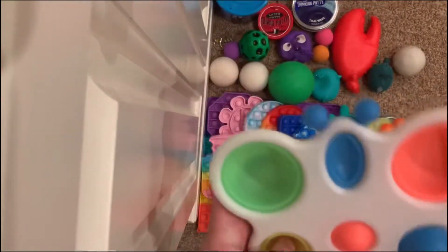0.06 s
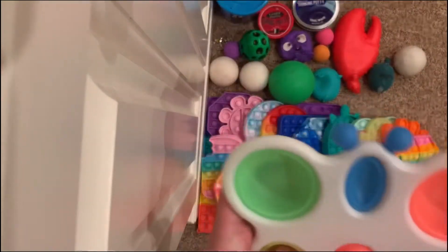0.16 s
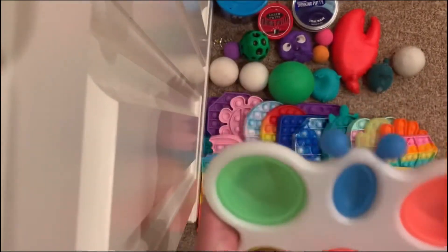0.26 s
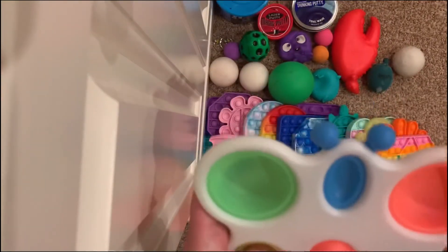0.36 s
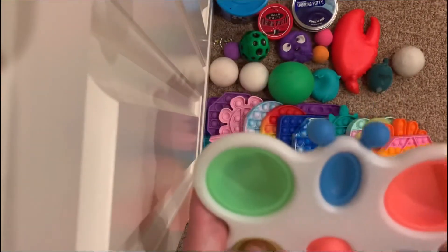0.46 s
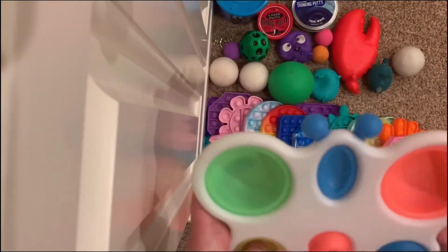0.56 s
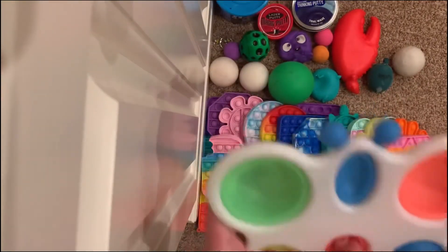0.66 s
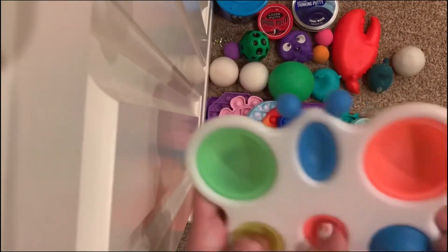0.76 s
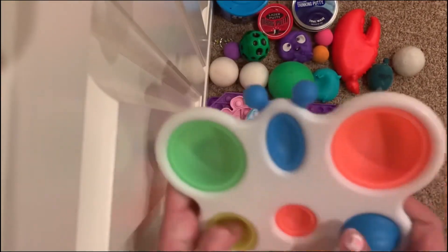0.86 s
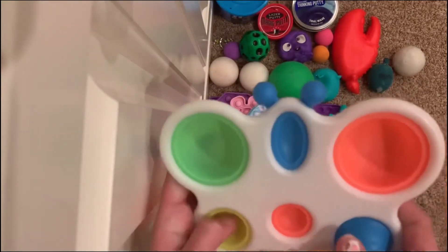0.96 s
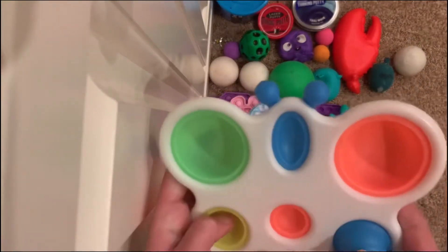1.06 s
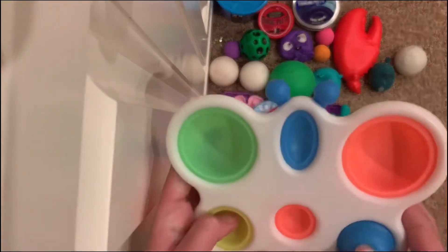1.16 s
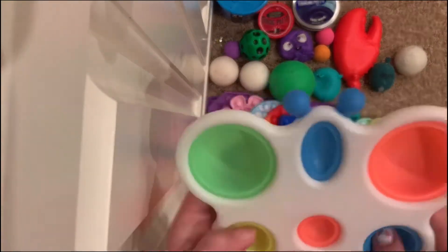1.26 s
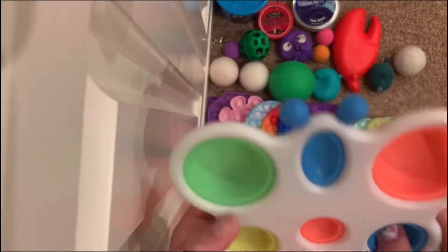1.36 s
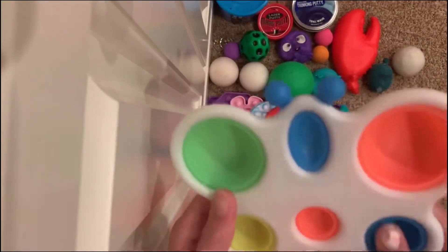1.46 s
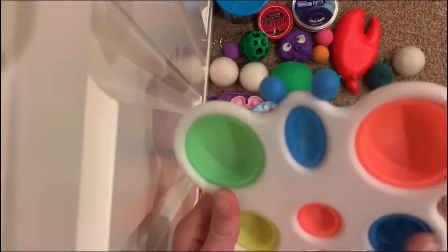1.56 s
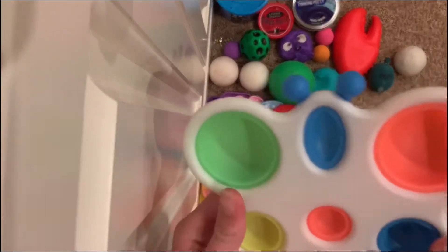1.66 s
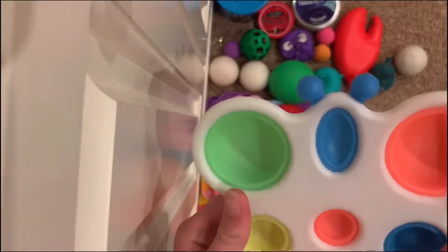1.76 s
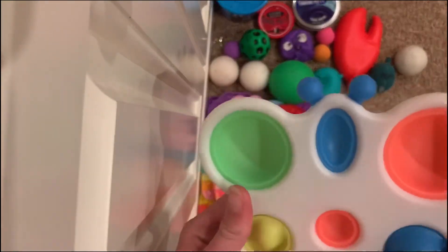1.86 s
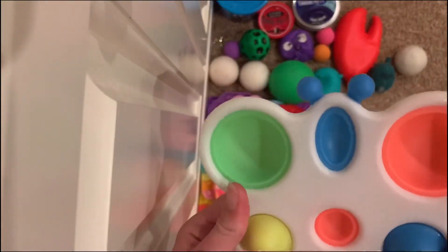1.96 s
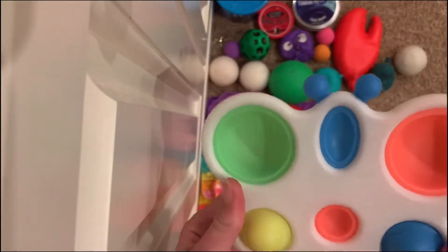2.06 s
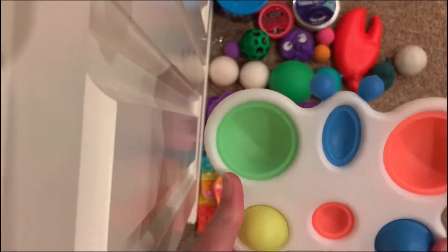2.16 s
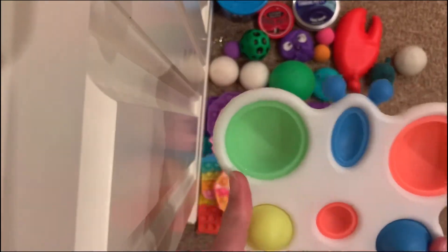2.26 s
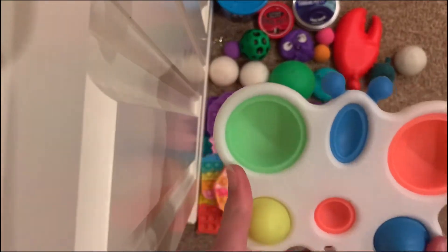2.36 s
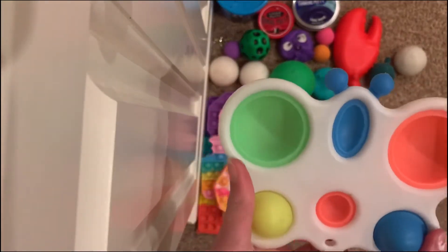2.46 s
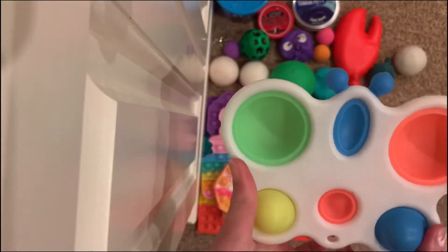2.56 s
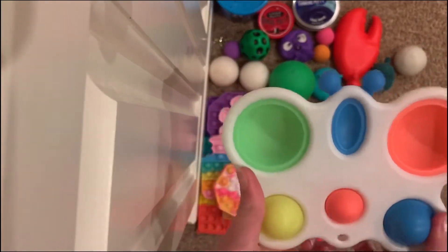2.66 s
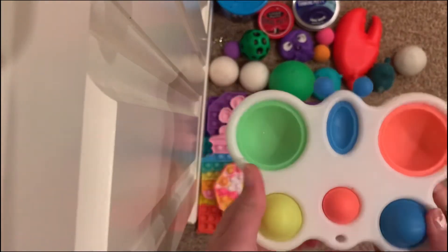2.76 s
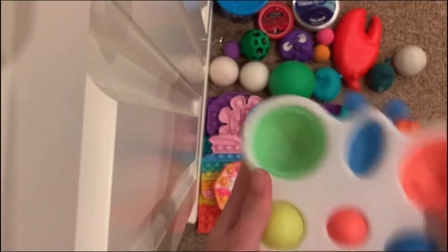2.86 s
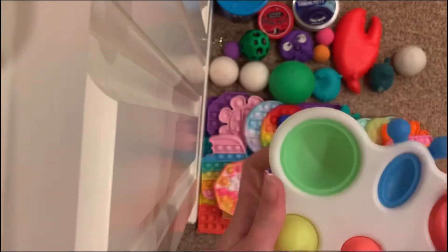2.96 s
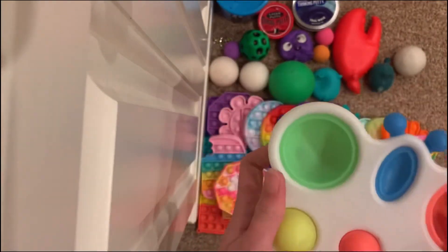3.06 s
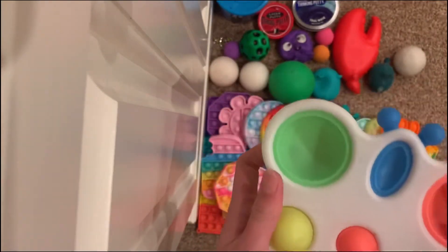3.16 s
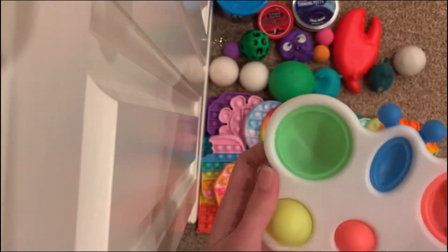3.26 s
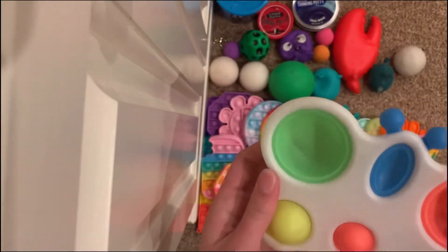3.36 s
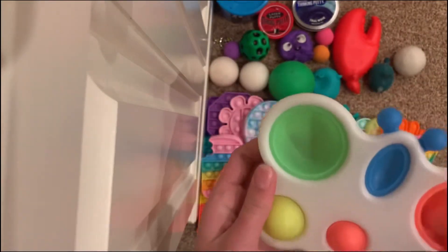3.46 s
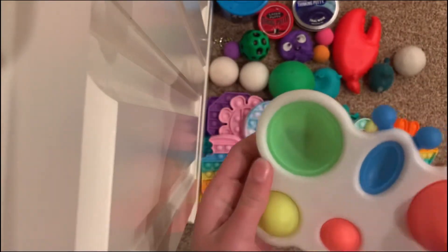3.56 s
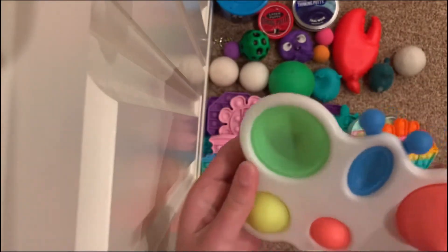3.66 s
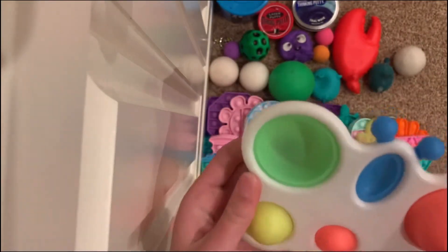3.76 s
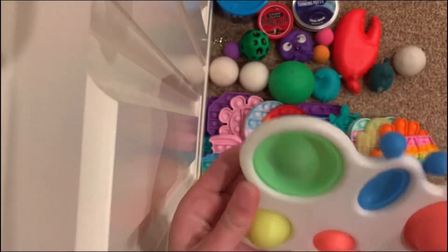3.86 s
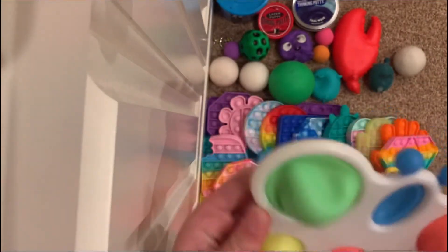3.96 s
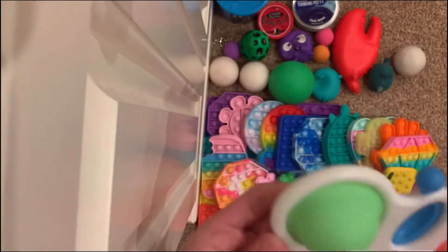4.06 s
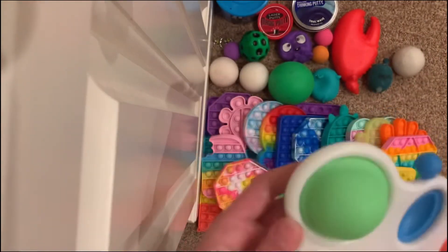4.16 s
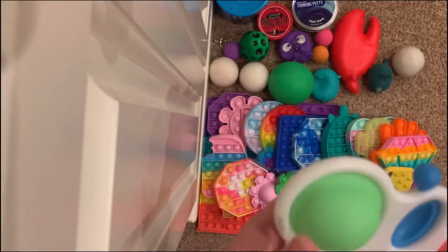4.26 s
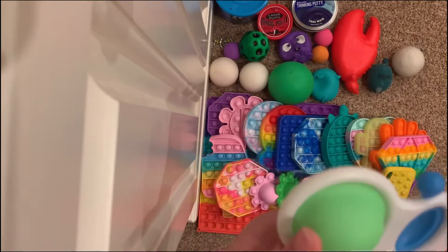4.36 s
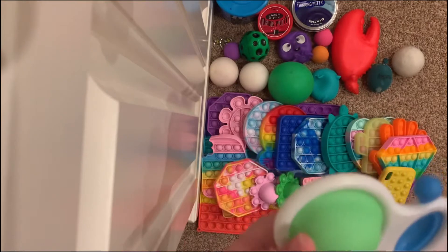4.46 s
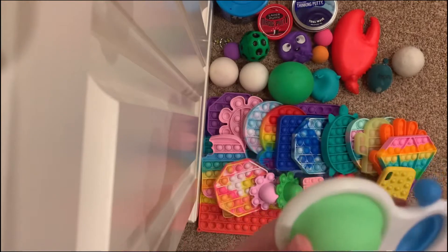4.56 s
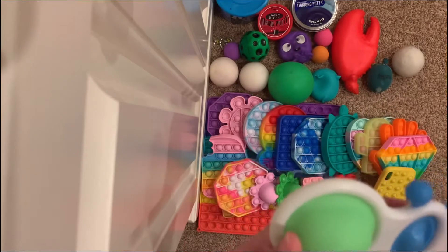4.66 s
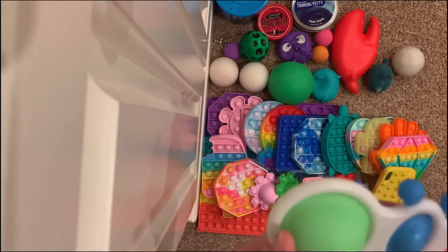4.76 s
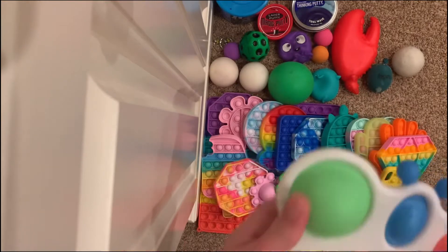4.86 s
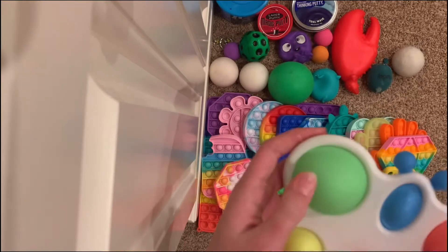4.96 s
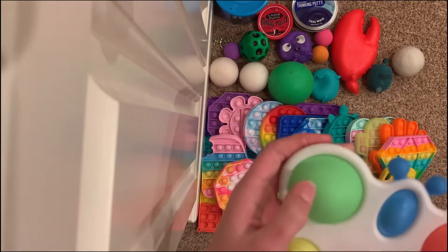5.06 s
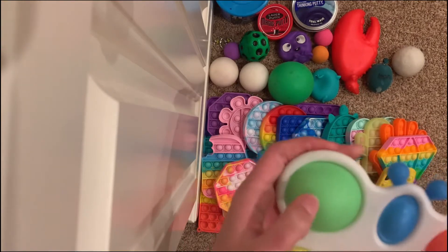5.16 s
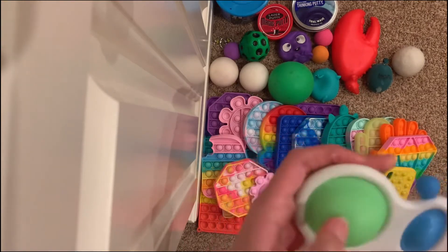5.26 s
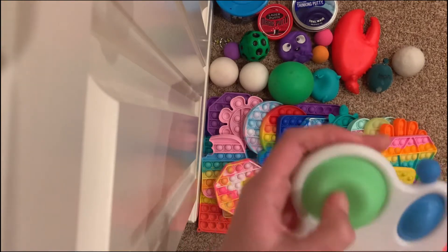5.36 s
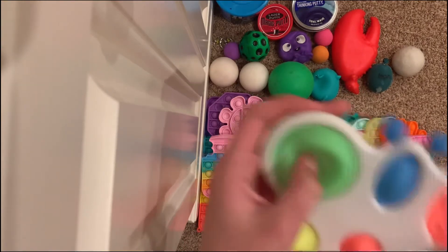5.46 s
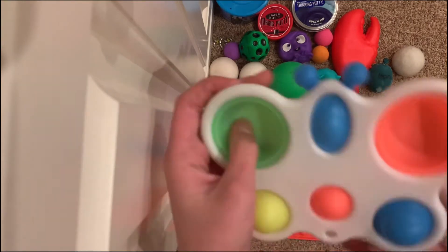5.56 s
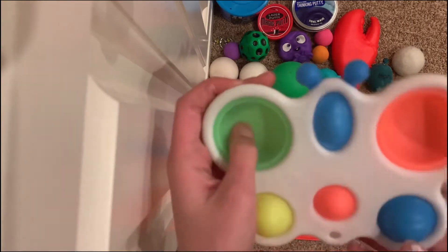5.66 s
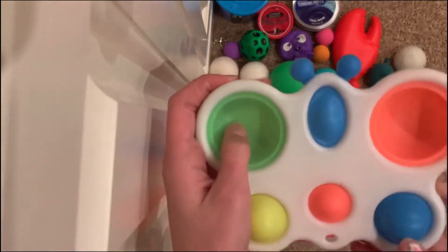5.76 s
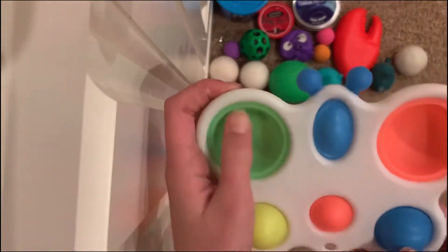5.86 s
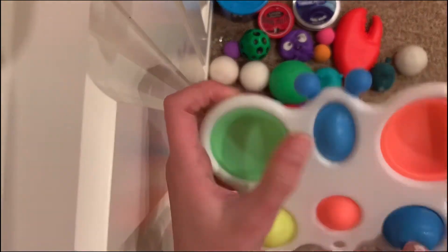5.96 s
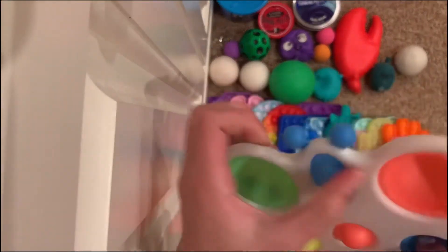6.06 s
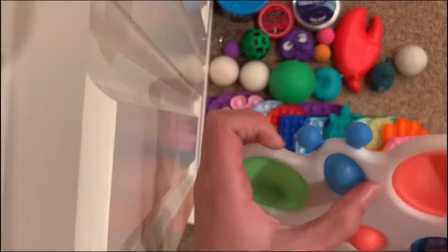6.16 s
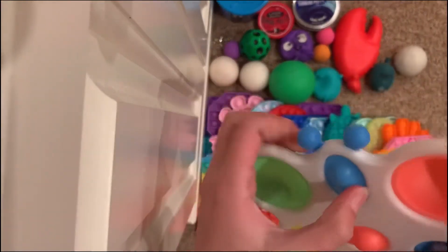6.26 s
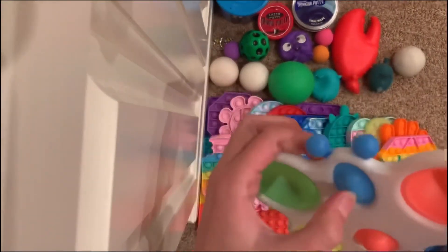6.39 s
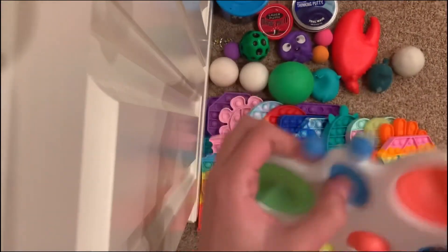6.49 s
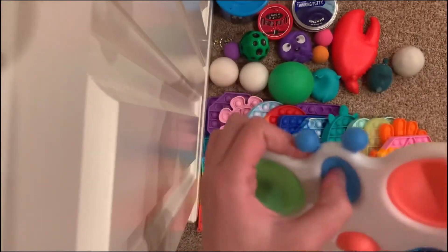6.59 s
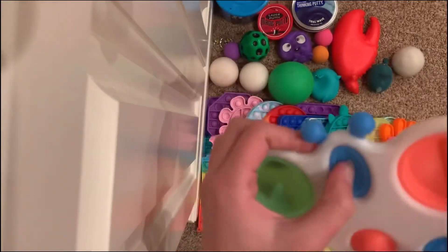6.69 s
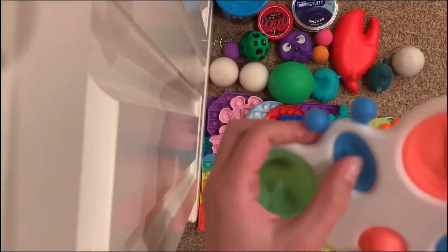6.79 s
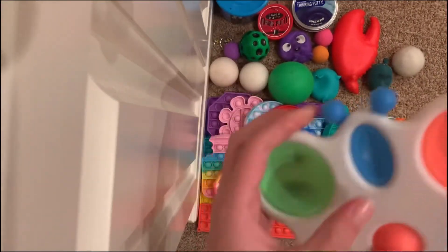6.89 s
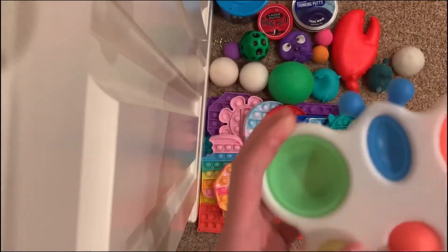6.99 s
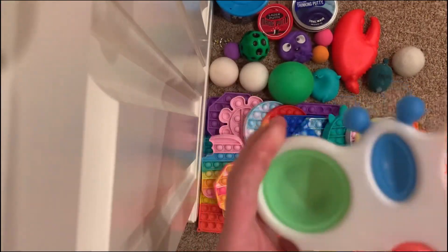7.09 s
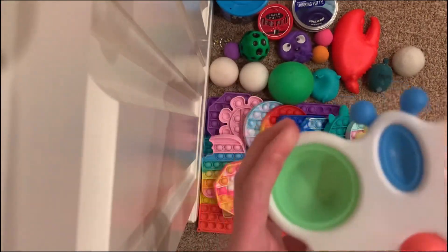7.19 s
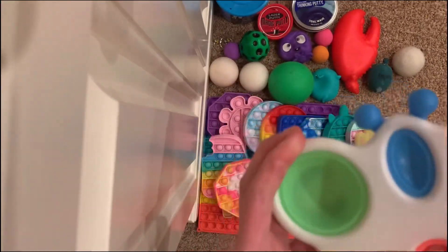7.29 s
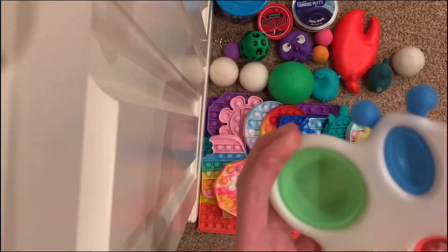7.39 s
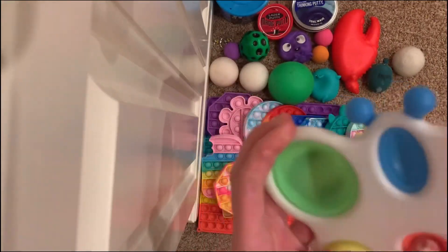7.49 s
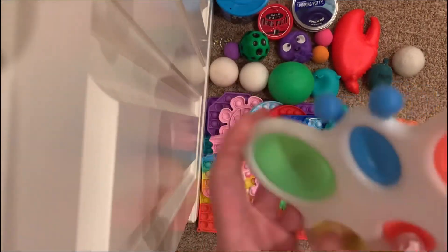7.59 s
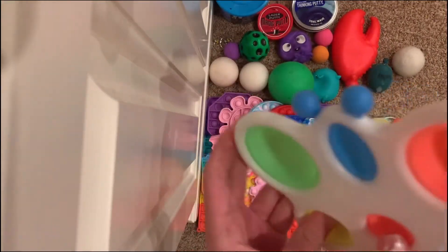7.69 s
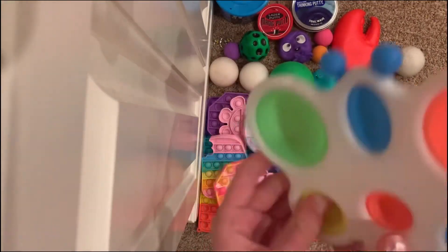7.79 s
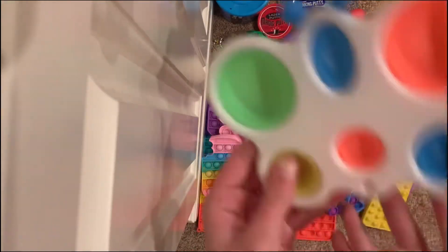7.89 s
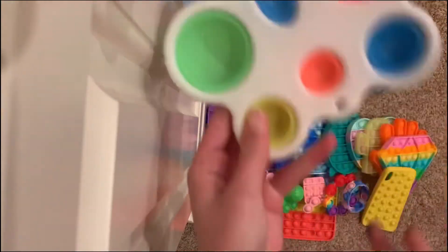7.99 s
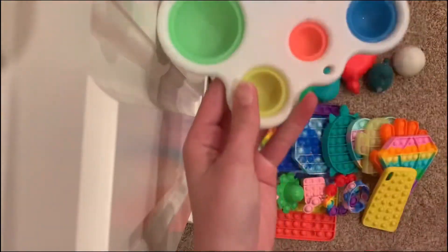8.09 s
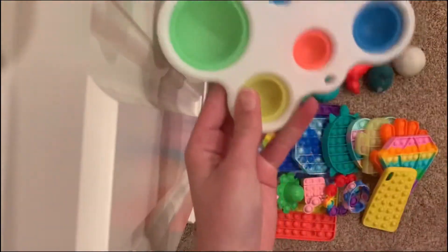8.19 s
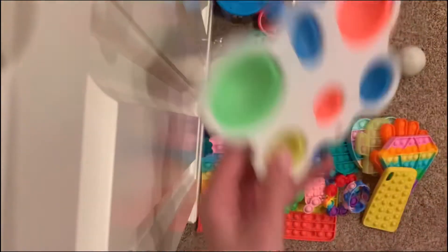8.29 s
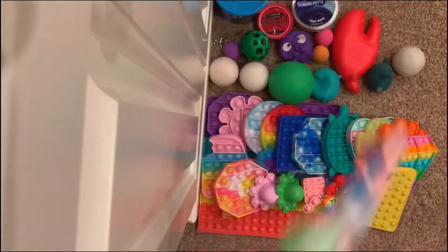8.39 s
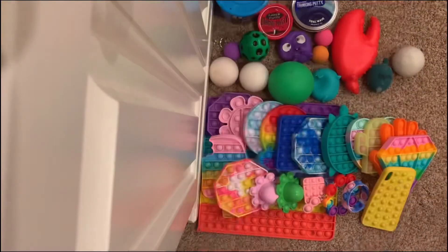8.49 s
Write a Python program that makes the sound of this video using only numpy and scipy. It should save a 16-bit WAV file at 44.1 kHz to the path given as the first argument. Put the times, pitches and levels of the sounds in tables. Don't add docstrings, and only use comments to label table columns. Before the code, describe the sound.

A hand-held popper toy is pressed bubble by bubble right by a two-sided microphone indoors. Strong popping snaps fill the first four seconds, then a quieter stretch of faint touches, then a cluster of sharper clicks from five seconds on. Light fingernail taps, skids and dry rubbing fill the gaps. A low hollow knock and handling scuffs come last, over still air and a weak appliance hum.

```python
import sys
import numpy as np
from scipy import signal
from scipy.fft import rfft, irfft, next_fast_len
from scipy.io import wavfile

SR = 44100
rng = np.random.default_rng(int(sys.argv[2]) if len(sys.argv) > 2 else 0)


def digitize_waveform(pressure):
    field = np.atleast_2d(pressure).T
    bounded = np.clip(field, -1, 1)
    quanta = np.round(bounded * 32767).astype(np.int16)
    wavfile.write(sys.argv[1], SR, quanta)


def boost_factor(decibels):
    exponent = np.asarray(decibels, float) / 20
    return 10 ** exponent


N = 376173
PADDED = next_fast_len(N + 4096)
HZ = np.arange(PADDED // 2 + 1) * SR / PADDED


def clock(seconds):
    return np.arange(round(seconds * SR)) / SR


def add(out, s, x):
    i = max(round(s * SR), 0)
    out[i:i + len(x)] += x[:N - i]


def rms_one(x):
    return x / np.sqrt(np.mean(x ** 2) + 1e-20)


def at_hz(points, hz):
    f, level = np.array(points).T
    return np.interp(np.log(hz + 1), np.log(f + 1), level)


def band(x, low_hz, high_hz):
    return signal.sosfilt(signal.butter(2, [low_hz, high_hz], "band", fs=SR, output="sos"), x)


def fade(t, t60):
    return boost_factor(-60 * t / t60)


def attack(t, rise):
    return 1 - np.exp(-t / rise)


def burst(t, low_hz, high_hz, t60, rise):
    x = band(rng.standard_normal(len(t)) * attack(t, rise) * fade(t, t60), low_hz, high_hz)
    return x / np.abs(x).max()


def wander(rate_hz):
    r = np.exp(-32 * np.pi * rate_hz / SR)
    slow = signal.lfilter([1], [1, -2 * r, r * r], rng.standard_normal(N // 16 + 3002))
    slow = slow[3000:]
    return np.interp(np.arange(N) / 16, np.arange(len(slow)), rms_one(slow))


def pops():
    # (peak t/s, ring peak level/dB, ring f/Hz, rattle rel. level/dB, crack rel. level/dB)
    domes = [(0.578, -5.5, 1307, -12, -6), (1.2228, -10, 1630, -17, -2.5), (1.7881, -11, 1125, -20.5, -14),
             (1.7938, -5, 823, -30, -17.5), (1.8944, -4.5, 1140, -28.5, -17),
             (2.5754, -7.5, 1110, -49.5, -21), (3.5274, -8, 1130, -27.5, -6), (3.919, -33, 1120, -15, -9.5),
             (3.963, -8, 1450, -15.5, -11), (5.202, -19.5, 1080, -4.5, -6.5),
             (5.2153, -19.5, 1361, -4.5, 0.5), (5.217, -15.5, 1200, -6.5, 5.5), (5.4557, -21, 860, -6, 5),
             (5.4877, -23.5, 2170, -5, -7), (5.5095, -12, 1606, -5.5, 0.5), (6.0181, -19.5, 840, -5, 7),
             (6.4816, -31.5, 1479, 1.5, 12.5), (6.484, -10.5, 1490, -8.5, 1), (7.2366, -13, 1374, -8, 1.5),
             (7.5875, -16.5, 1130, -10.5, -0.5)]
    swell_s = .0009
    out, t = np.zeros(N), clock(.08)
    for s, db, hz, rattle_db, crack_db in domes:
        turns = hz * (0.79 * t + .0011 * attack(t, 0.0018))
        skin = t / swell_s * np.exp(1 - t / swell_s) * np.sin(2 * np.pi * turns)
        flap = boost_factor(-6.0) * burst(t, 350, 1400, 0.027, rise=0.00088)
        rattle = boost_factor(rattle_db + 10.0) * burst(t, 2600, 4700, 0.023, rise=0.0028)
        crack = boost_factor(crack_db + 10.0) * burst(t, 3100, 15000, 0.011, rise=0.00045)
        creak = boost_factor(-19.5) * burst(t, 560, 3000, 0.018, rise=0.00063)[::-1]
        creak = creak + boost_factor(-42.0) * burst(t, 3500, 13000, 0.065, rise=.002)[::-1]
        add(out, s - swell_s, boost_factor(db - 2.5) * (skin + flap))
        add(out, s - .0015, boost_factor(db - 2.5) * (rattle + crack))
        add(out, s - swell_s - t[-1], boost_factor(db) * creak)
    return out


def rings():
    # (t/s, peak level/dB, f/Hz, t60/s)
    frame_tones = [(0.576, -12.5, 1396, 0.023), (1.2212, -15.5, 1630, 0.012), (1.2235, -18, 855, 0.014),
                   (1.796, -12.5, 985, 0.015), (1.8955, -14, 1000, .025), (2.576, -17, 800, 0.014),
                   (3.526, -11.5, 1086, 0.026), (3.528, -18, 1602, 0.016), (3.9625, -14, 2178, 0.028),
                   (3.963, -13, 915, 0.023), (5.2152, -3, 1197, .022), (5.5105, -16, 1050, .015),
                   (5.51, -14, 2300, .01), (5.2191, -21.5, 1850, 0.032), (5.4543, -25, 2500, 0.016),
                   (5.5092, -3, 1730, 0.013), (6.021, -26, 1125, 0.022), (6.484, -19, 1500, 0.02),
                   (7.2352, 0, 1440, .02), (7.2385, -11, 760, 0.014), (7.2405, -13, 1600, .02),
                   (7.588, -23, 540, 0.035), (8.4755, -24, 1050, 0.019), (8.486, -35.5, 1960, 0.018),
                   (1.226, -20, 282, 0.037), (3.53, -25.5, 248, 0.036)]
    out, t = np.zeros(N), clock(.06)
    for s, db, hz, t60 in frame_tones:
        add(out, s, boost_factor(db) * attack(t, .0008) * fade(t, t60) * np.sin(2 * np.pi * hz * t))
    return out


def puffs():
    # (peak t/s, peak level/dB, f/Hz, recoil rel. level/dB)
    cups = [(0.1414, -61, 207, 17), (0.5788, -20, 337, -11.5), (1.208, -28.5, 330, -8),
            (1.2234, -15, 592, -18.5), (1.7939, -5.5, 757, -19), (1.8373, -26.5, 456, -17.5),
            (1.8952, -10.5, 572, -34.5), (2.575, -16.5, 860, -12.5), (3.529, -6.5, 554, -32),
            (3.9212, -22, 547, -19.5), (3.9657, -10, 375.6, -14), (4.6625, -39, 240, 0.5),
            (4.8043, -48.5, 253, 1), (5.205, -20.5, 407, -1.5), (5.219, -14.5, 388, -8.5),
            (5.458, -17.5, 314.4, -15.5), (5.514, -9.5, 318, -8.5), (6.0099, -24.5, 361, -16.5),
            (6.02, -18, 504.4, -8.5), (6.4844, -24, 641.5, -5), (7.2374, -15, 340.5, -15.5),
            (7.5877, -11.5, 504, -13.5), (8.517, -34.5, 500, -2.5)]
    out, t = np.zeros(N), clock(.1)
    for s, db, hz, recoil_db in cups:
        turns = hz * (t + 0.00019 * attack(t, 0.004))
        pump = attack(t, 0.0026) * fade(t, 0.011) * np.sin(2 * np.pi * turns)
        recoil = boost_factor(recoil_db + 1.5) * np.sin(2 * np.pi * 185 * t) * fade(t, 0.048)
        add(out, s - .002, boost_factor(db - 0.5) * (pump / np.abs(pump).max() + recoil))
    return out


def sways():
    # (t/s, level/dB, f/Hz)
    swings = [
        (1.229, -37.5, 108.6),
        (2.579, -39, 171.2),
        (2.895, -42, 120),
        (3.02, -43.5, 110),
        (3.97, -33, 111.3),
        (5.519, -32, 139.4),
        (6.026, -34.5, 110.6),
        (6.488, -22.5, 94.5),
        (8.49, -41.5, 71.3),
    ]
    out, t = np.zeros(N), clock(.15)
    for s, db, hz in swings:
        add(out, s, boost_factor(db) * attack(t, 0.0022) * fade(t, 0.058) * np.sin(2 * np.pi * hz * t))
    return out


def ticks():
    # (peak t/s, peak level/dB, centre f/Hz, bright edge rel. level/dB)
    taps = [(0.004, -28, 1840, -9), (0.24, -45.5, 1004, -12.5), (0.541, -51.5, 1576, 6),
            (1.155, -39, 1597, -10), (2.102, -32.5, 1276, -3), (2.206, -39, 1100, -10.5),
            (2.606, -44, 1074, -12.5), (2.65, -59, 1057, -10), (2.708, -57.5, 1216, 1.5),
            (2.757, -50, 1910, -19), (2.789, -48, 1890, -16), (3.245, -38.5, 1160, -11.5),
            (3.489, -51.5, 1176, -2.5), (4.781, -58.5, 1074, -7), (4.977, -61.5, 1200, -24.5),
            (5.642, -52, 1290, 3), (5.931, -50.5, 2110, 0), (6.788, -44, 1280, -8), (6.973, -40, 1225, -4),
            (7.133, -51.5, 1180, -19), (7.547, -35.5, 1140, -34.5), (7.987, -27, 2010, -2.5)]
    pats = [(0.725, -49, 1150, 1.5), (0.783, -51.5, 1342, 16), (1.207, -34, 1654, 8.5),
            (1.403, -45.5, 1147, 14.5), (1.781, -42.5, 1183, -25), (1.562, -64.5, 1060, 8.5),
            (1.686, -58.5, 1446, 8), (2.216, -49, 879, -6.5), (2.338, -59, 1274, -15),
            (3.233, -52, 1099, -16.5), (3.682, -65.5, 776, -13), (4.142, -40, 1010, -1),
            (4.158, -49.5, 1051, -6), (4.186, -56, 1192, 7.5), (4.296, -54, 928, 3),
            (5.862, -46, 1931, -13), (6.442, -71, 1515, 13), (7.204, -51.5, 1244, 5),
            (7.458, -45.5, 1217, 11.5), (7.571, -48.5, 1282, 18.5), (7.743, -36, 1170, 1),
            (7.946, -75, 1630, -15), (8.126, -49.5, 1470, -15), (8.253, -61.5, 1222, -23)]
    skids = [(0.06, -34, 1820, -14), (0.252, -45.5, 1180, 4), (1.177, -48, 1290, -5), (1.332, -51, 1944, 8),
             (1.438, -47.5, 1550, -0.5), (2.431, -50.5, 1324, -38.5), (2.893, -28.5, 1772, 2.5),
             (3.027, -32, 1495, -7), (3.105, -47, 1177, -25), (4.8, -57, 1046, 1), (4.868, -47, 1208, 5),
             (4.996, -55.5, 1183, -18.5), (5.827, -44.5, 1805, -33), (6.008, -34.5, 1802, 8),
             (6.984, -44.5, 1247, -0.5), (7.041, -47, 1067, -23.5), (7.107, -47, 1127, -17),
             (8.002, -29, 1650, -5), (8.04, -25, 1187, -15.5), (8.477, -39, 800, -2.5),
             (8.467, -46.5, 700, -6)]
    # (thud rel. level/dB, t60/s)
    kinds = [
        (-13, 0.015),
        (-1, 0.013),
        (-9, .055),
    ]
    out, t = np.zeros(N), clock(.12)
    for touches, (thud_db, t60) in zip((taps, pats, skids), kinds):
        for s, db, hz, bright_db in touches:
            tap = np.sin(2 * np.pi * hz * t) * fade(t, .011)
            scuff = burst(t, 0.7 * hz, 2.4 * hz, 1.2 * t60, rise=0.001)
            thud = boost_factor(thud_db) * burst(t, 200, 750, 1.6 * t60, rise=.0015)
            edge = boost_factor(bright_db + 5) * burst(t, 3000, 18000, 0.7 * t60, rise=.001)
            add(out, s - .0015, boost_factor(db + 0.5) * (tap + scuff + thud + edge))
    return out


def swishes():
    # (middle t/s, length t/s, rms level/dB, centre f/Hz)
    strokes = [(0.026, 0.0087, -43.5, 1670), (0.02, .03, -51.5, 2000), (0.38, 0.01, -72.5, 1000),
               (0.989, 0.043, -69.5, 1600), (1.3, 0.027, -49, 9900), (1.549, 0.031, -67.5, 7530),
               (2.93, 0.051, -57.5, 600), (2.937, 0.063, -55, 9500), (2.931, 0.052, -49, 2400),
               (3.04, 0.028, -46, 1360), (3.04, .03, -51, 7200), (3.089, 0.051, -53, 710),
               (3.126, 0.0048, -68, 7700), (0.488, 0.038, -72, 8200), (7.81, 0.086, -57.5, 6000),
               (3.968, .003, -21.5, 2300), (3.529, 0.0016, -26.5, 12050), (3.184, 0.031, -58.5, 9900),
               (4.4, 0.079, -68.5, 7590), (3.962, 0.0016, -10.5, 15000), (4.328, .03, -72.5, 1100),
               (4.033, 0.054, -51.5, 2086), (4.33, 0.083, -64, 8430), (5.09, 0.041, -68, 2300),
               (6.1, 0.015, -59, 1110), (5.862, 0.002, -33, 2000), (5.926, 0.024, -59, 1950),
               (6.321, 0.023, -77, 1292), (6.638, 0.018, -55, 7490), (6.655, 0.033, -58, 1300),
               (6.878, 0.013, -65.5, 1184), (6.916, 0.16, -60.5, 11400), (7.133, 0.022, -67.5, 5800),
               (7.784, 0.027, -56, 974), (8.5, 0.024, -61, 2000), (8.512, 0.006, -46, 1100),
               (8.511, .006, -54, 7500), (3.995, 0.027, -45.5, 2300), (4.09, .06, -61, 2000)]
    out = np.zeros(N)
    for s, length, db, hz in strokes:
        size = round(2 * length * SR)
        grains = rng.standard_normal(12000)[:size] * boost_factor(3. * rng.exponential(1, 12000)[:size])
        slide = rms_one(band(grains, hz / 1.5, min(hz * 1.6, 14500)))
        add(out, s - length, boost_factor(db) * np.hanning(len(grains)) * slide)
    return out


def rubbing():
    # (full from t/s, hold t/s, dull level/dB, hiss rel. level/dB)
    slides = [(0.0, 0.044, -47, -14), (0.106, 0.027, -59.5, -22), (0.213, 0.04, -66, 1.5),
              (0.6, 0.24, -57.5, -12), (1.245, 0.2, -62, -5.5), (1.525, .16, -83.5, -2),
              (1.923, 0.14, -64, -15.5), (2.655, .04, -73.5, 4), (2.74, 0.11, -69.5, 2),
              (2.901, 0.27, -57.5, -16.5), (3.551, 0.077, -68.5, 2), (3.773, .07, -81, -0.5),
              (3.985, 0.15, -63.5, -11), (4.182, 0.04, -83, -3.5), (4.815, 0.135, -74, -5),
              (5.243, 0.38, -62.5, -11), (5.541, 0.13, -68, -2), (5.823, 0.43, -75.5, 0.5),
              (6.041, 0.051, -57.5, -1), (6.51, 0.074, -65, -4.5), (6.63, 0.055, -72, 5.5),
              (6.757, .06, -68, 2.5), (6.889, 0.077, -72.5, 1.5), (7.046, 0.11, -64, -15.5),
              (7.271, 0.0683, -59.5, -11), (7.456, 0.1184, -60.5, -7), (7.617, 0.045, -67, -4.5),
              (7.743, .12, -64.5, 2), (7.918, 0.075, -73.5, -7), (8.02, 0.051, -53, -21.5),
              (8.494, .06, -62, 6)]
    press_db_per_s, lift_db_per_s = 300, 347
    rest_db = -87.5
    now, dull_gain, hiss_gain = np.arange(N) / SR, boost_factor(rest_db), boost_factor(rest_db)
    for s, hold, db, hiss_db in slides:
        coming = press_db_per_s * (s - now).clip(0)
        going = lift_db_per_s * (now - s - hold).clip(0)
        press = boost_factor(db - coming - going)
        dull_gain = dull_gain + press
        hiss_gain = hiss_gain + boost_factor(hiss_db) * press
    grip_db, flutter_db = 3 * wander(30.), 5 * wander(20.)
    slips = rng.standard_normal((2, N)) * boost_factor(5.5 * rng.exponential(1, (2, N)).clip(0, 4))

    dull = 0
    for low_hz, high_hz in ((220, 500), (480, 1300), (1100, 2500), (2200, 4500)):
        dull = dull + boost_factor(2. * wander(14.)) * band(slips[0], low_hz, high_hz)
    dull = dull_gain * boost_factor(grip_db + 0.5) * rms_one(dull)

    fine = band(band(slips[1], 3800, 21000), 2200, 21000)
    hiss = 0
    for low_hz, high_hz, db in ((3020, 3100, -5.5), (5940, 11000, 0.27), (10200, 13000, 0.56)):
        hiss = hiss + boost_factor(db + 2.5 * wander(12.)) * band(fine, low_hz, high_hz)
    hiss = hiss_gain * boost_factor(0.68 * flutter_db + 5.0) * rms_one(hiss)
    return dull + hiss


def modes(t, table, spread_db, detune):
    strength, shift = rng.normal(0, 1, (2, len(table)))
    sign = rng.choice([-1, 1], len(table))
    out = 0
    for (hz, db, t60), g, d, u in zip(table, strength, shift, sign):
        tone = np.sin(2 * np.pi * hz * (1 + detune * d) * t)
        out = out + u * boost_factor(db + spread_db * g) * tone * fade(t, t60)
    return out


def knock():
    # (t/s, level/dB)
    blows = [
        (8.039, -24.5),
        (8.061, -37.5),
    ]
    # (f/Hz, level/dB, t60/s)
    cabinet = [(64.6, -7, 0.5), (80.5, -7, 0.4), (113.3, -12, 0.31), (162.4, 0, 0.19), (204, -7.5, 0.327),
               (253, -5.5, 0.26), (368, -18, 0.17), (444.5, -2, 0.35), (515, -5.5, 0.13), (623, -32, 0.17),
               (800, -30, 0.25)]
    stop_s = 0.3
    out, t = np.zeros(N), clock(.5)
    for s, db in blows:
        stilled = boost_factor(-400 * (t - stop_s).clip(0))
        ring = attack(t, 0.00067) * modes(t, cabinet, spread_db=1.5, detune=0.0028) * stilled
        boom = boost_factor(-1) * burst(t, 70, 320, 0.3, rise=.004)
        add(out, s, boost_factor(db) * (ring + boom))
    return out


def room(x):
    # (low f/Hz, high f/Hz, level/dB, t60/s)
    echo_bands = [
        (99, 280, -29.5, 0.6),
        (260, 1100, -26, 0.45),
        (800, 1400, -30, 0.35),
        (1500, 3600, -24, .4),
        (3220, 5900, -29, 0.3),
        (10600, 13800, -37.5, .4),
    ]
    t = clock(.5)
    noise = rng.standard_normal((3, len(t))) * np.clip((t - .0015) / 0.0031, 0, 1)
    echo = 0
    for low_hz, high_hz, db, t60 in echo_bands:
        echo = echo + boost_factor(db - 19.5) * band(noise, low_hz, high_hz) * fade(t, t60)
    stir = .9 + 0.42 * np.array([wander(61.0) for _ in range(3)])
    wet = signal.fftconvolve(x[None], echo, axes=1)[:, :N] * stir
    treble, rest = band(wet[0], 4800, 14500), band(wet[1:], 60, 5500)
    bounce = boost_factor(-25) * band(np.roll(x, round(.0195 * SR)), 600, 1500)
    return boost_factor(0.5) * treble + bounce, boost_factor(4.0) * rest


def ports(x):
    # (f/Hz, phase/rad)
    left_lead = [(0, 0), (170, -.55), (650, -1.), (1000, .3), (1900, .4), (2600, 1.4), (3100, 3.2),
                 (3500, 1.9), (4200, 1.7), (5000, 3.7), (6300, 5.4), (9100, 8.8), (11800, 12),
                 (17000, 17.8)]
    # (f/Hz, level/dB)
    shade = [(150, 0), (750, -8), (1100, -3), (1900, -3), (2350, -9.5), (3400, 1), (5000, -5), (5800, 1)]
    lead = np.interp(HZ, *np.transpose(left_lead))
    half = boost_factor(at_hz(shade, HZ) / 2) * np.exp(.5j * lead)
    return irfft(rfft(x, PADDED) * np.array([half, 1 / half]), PADDED)[:, :N]


def background():
    # (f/Hz, level per Hz/dB)
    air_colour = [(15, -46.5), (25, -16.5), (48, -11.5), (72, -7.5), (87, -25.5), (102, -14), (123, -5.5),
                  (153, -25.5), (531, -53), (6560, -66), (10100, -73.5), (11300, -59.5), (16000, -76)]
    # (f/Hz, peak level/dB, wobble f/Hz)
    hum = [
        (60.7, -63, 2.6),
        (115.6, -61.5, 4.8),
    ]
    mid, side = rfft(rng.standard_normal((2, PADDED)))
    unlike = np.clip(HZ / 350, 0, 1) ** 2
    both = mid + unlike * side * [[1], [-1]]
    out = boost_factor(-56.5) * rms_one(irfft(boost_factor(at_hz(air_colour, HZ)) * both, PADDED)[:, :N])
    for hz, db, wobble_hz in hum:
        level = boost_factor(db + 1.3 * wander(wobble_hz))
        out = out + level * np.sin(2 * np.pi * hz * np.arange(N) / SR + 1.3 * wander(2.7))
    return out


def scene():
    toy = pops() + puffs() + ticks() + swishes() + sways()
    bump, frame = knock(), rings()
    smear = .6 + .75 * wander(800.)
    near, diffuse = room((toy + boost_factor(-7) * frame) * smear + bump)
    return ports(toy + frame + bump + near + rubbing()) + diffuse + background()


def band_limit(x):
    return signal.sosfilt(signal.butter(12, 17320, fs=SR, output="sos"), x)


def record(dry):
    # (f/Hz, level/dB)
    capsule = [(20, -26), (55, -2.5), (1500, -1.5), (3000, -6.5), (4800, -12.5), (7000, -4.5), (9700, -9),
               (12500, -13.5), (14300, -7), (16500, -31.5)]
    x = irfft(rfft(dry, PADDED) * boost_factor(at_hz(capsule, HZ)), PADDED)
    rounded = 1.077 * np.tanh(x / 0.68)
    mix = irfft(rfft(rounded) * (HZ < 17000), PADDED)[:, :N]
    return band_limit(mix)


dry = scene()
out = record(dry)
digitize_waveform(out)
```